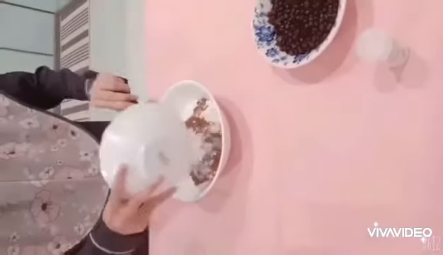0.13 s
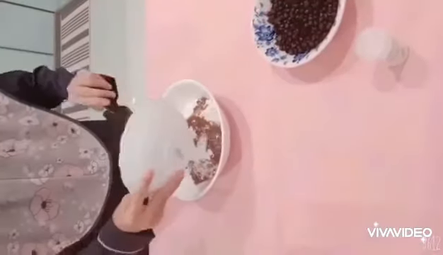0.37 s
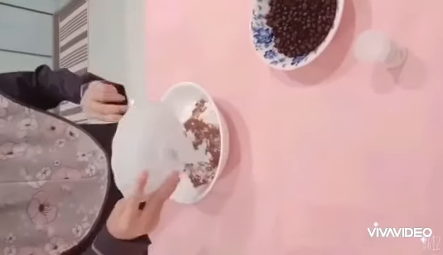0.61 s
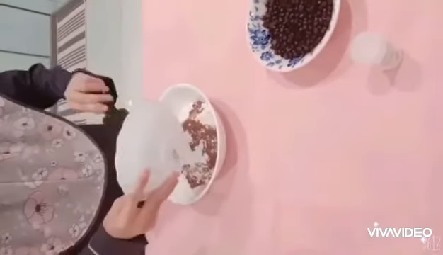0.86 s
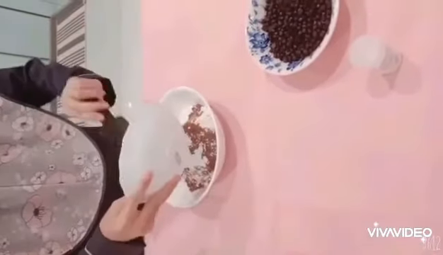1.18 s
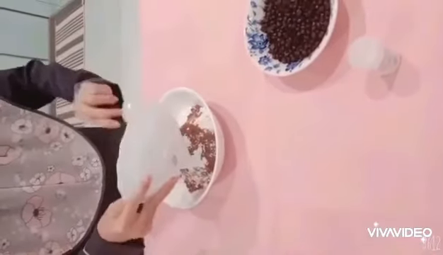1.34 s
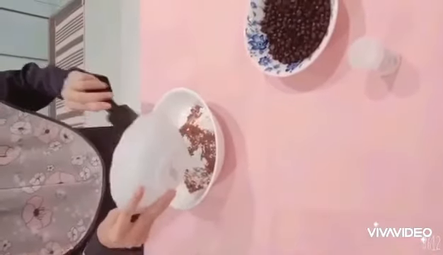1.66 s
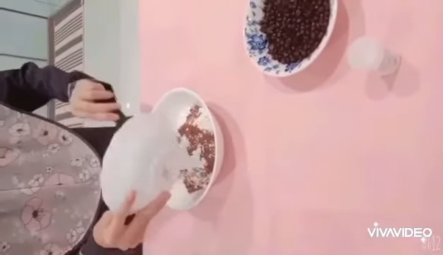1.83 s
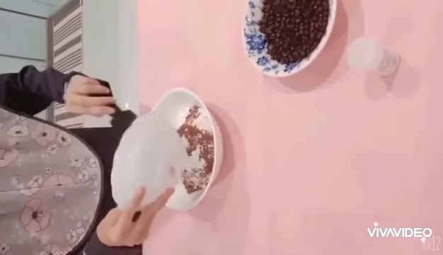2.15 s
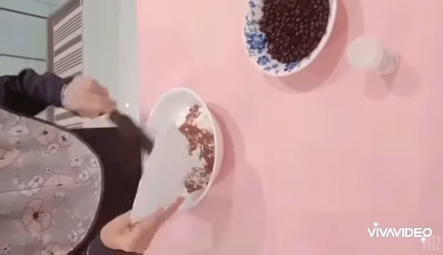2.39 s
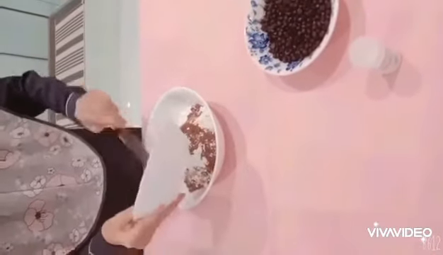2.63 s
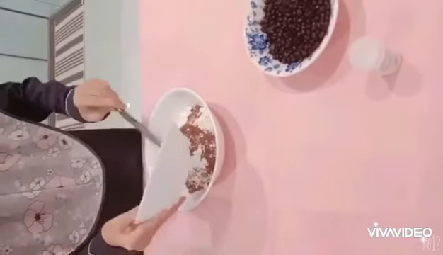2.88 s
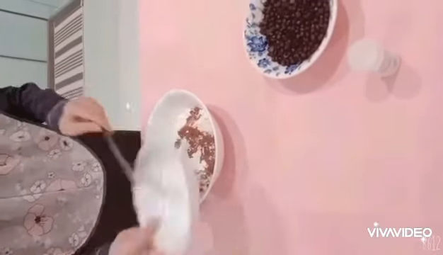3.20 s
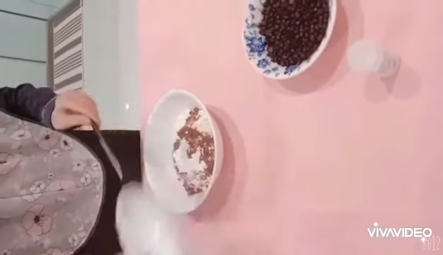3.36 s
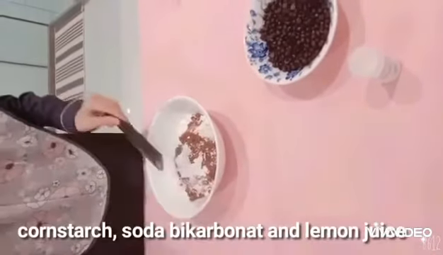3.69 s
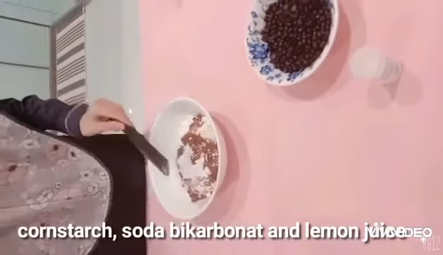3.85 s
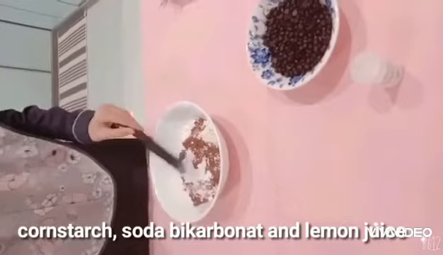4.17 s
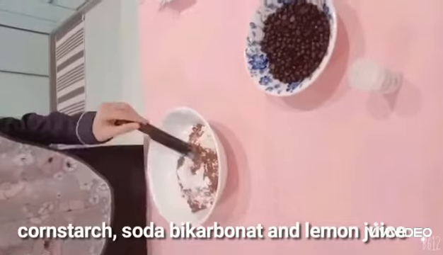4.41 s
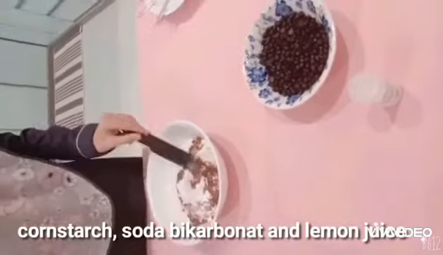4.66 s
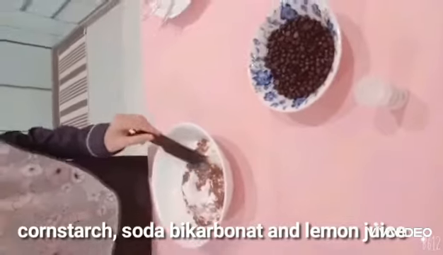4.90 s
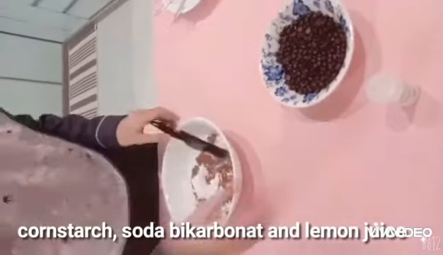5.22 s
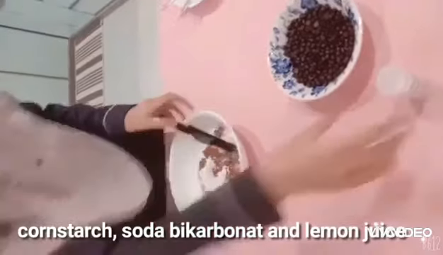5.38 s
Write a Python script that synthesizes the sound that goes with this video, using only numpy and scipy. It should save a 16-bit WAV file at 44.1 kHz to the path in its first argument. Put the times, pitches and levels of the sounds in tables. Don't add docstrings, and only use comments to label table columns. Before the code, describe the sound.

Close, slightly muffled phone pickup at a kitchen table: low hum and soft handling rumble, sparse knife knocks and short hisses of powder grains. Two bright, quickly damped ceramic clinks follow, each with small crumbs and rattles. After a lull comes a much louder double bang of crockery on the table, a final clack, and the room decays back to hum.

```python
import sys
import numpy as np
from scipy import signal
from scipy.fft import rfft, irfft
from scipy.io import wavfile
from scipy.ndimage import uniform_filter1d

SR = 44100
rng = np.random.default_rng(int(sys.argv[2]) if len(sys.argv) > 2 else 0)


def pcm_store(signal):
    levels = np.round(np.clip(np.atleast_2d(signal), -1, 1) * 32767)
    wavfile.write(sys.argv[1], SR, levels.astype(np.int16).T)


def gain_from_decibels(decibels):
    exponent = np.asarray(decibels, float) / 20
    return 10 ** exponent


N = 244029

# (frequency [Hz], level [dB])
CRACK_COLOUR = [(600, -31.5), (900, -3), (1500, -5.5), (2500, 5.5), (4500, 0), (6000, 1.5), (7500, -21.5),
                (10000, -29.5), (11000, -54)]
BRIGHT_RISE_S = 0.0003


def evened(x):
    return x / np.sqrt(np.mean(x ** 2) + 1e-20)


def read(points, hz):
    f, value = np.transpose(points)
    return np.interp(np.log(hz + 1), np.log(f + 1), value)


def add(mix, s, sound):
    part = mix[max(round(s * SR), 0):][:len(sound)]
    part += sound[:len(part)]


def coloured(x, points):
    gain = gain_from_decibels(read(points, np.fft.rfftfreq(len(x), 1 / SR)))
    return irfft(rfft(x) * gain, len(x))


def wobble(count, width_hz, at=None):
    r = np.exp(-np.pi * width_hz * 32 / SR)
    steps = count // 32 + 102
    draws = 700 + steps
    z = rng.standard_normal(draws) + 1j * rng.standard_normal(draws)
    z = signal.lfilter([np.sqrt(0.5 - r * r / 2)], [1, -r], z)[-steps:]
    where = np.arange(count) if at is None else at
    return np.interp(where / 32, np.arange(steps), z)


def mottled(x, patchy_db, bins, frames):
    z = signal.stft(x, nperseg=512, noverlap=384)[2]
    patches = uniform_filter1d(rng.standard_normal(z.shape), size=bins, axis=0)
    patches = uniform_filter1d(patches, size=frames, axis=1)
    return signal.istft(z * gain_from_decibels(patchy_db * evened(patches)), nperseg=512, noverlap=384)[1][:N]


def hollow(hz, width_hz):
    r = np.exp(-np.pi * width_hz / SR)
    slow = rng.standard_normal(N) + 1j * rng.standard_normal(N)
    for _ in range(2):
        slow = signal.lfilter([1 - r], [1, -r], slow)
    return evened((slow * np.exp(2j * np.pi * hz * np.arange(N) / SR)).real)


def ring(modes, rise=0.00067, rough=0., free=0.81):
    longest_s = max(t60 for _, _, t60 in modes)
    t = np.arange(round(SR * min(0.5, free * longest_s))) / SR
    starts = np.arange(len(modes))[:, None] * (SR // 2)
    chance = wobble(SR // 2 * len(modes), 40, starts + np.arange(len(t)))
    hz, db, t60 = np.transpose(modes)[:, :, None]
    blur = 1 + rough * np.minimum(hz / 400, 1) * chance * (1 - np.exp(-t / 0.0033))
    decay = gain_from_decibels(db - 60 * t / (t60 * free))
    x = (decay * blur * np.exp(2j * np.pi * hz * t)).imag.sum(0)
    return x * (1 - np.exp(-t / rise)) / abs(x).max()


def puff(points, t60, rise):
    t = np.arange(SR // 2 if t60 > 0.15 else SR // 8) / SR
    noise = evened(coloured(rng.standard_normal(len(t)), points))
    return noise * gain_from_decibels(-60 * t / t60) * (1 - np.exp(-t / rise))


def kitchen():
    # (frequency [Hz], level [dB per Hz])
    air_colour = [(15, -74), (25, -29.5), (64, -26.5), (123, -6.5), (242, -15), (401, -18.5), (433, -20.5),
                  (586, -27), (878, -30.5), (1250, -15.5), (1420, -31), (1780, -27), (3790, -43.5),
                  (6610, -42.5), (10400, -59.5), (13500, -99), (22000, -120)]
    # (frequency [Hz], width [Hz], level [dB])
    hollows = [(1257, 74, -62.5), (651.4, 240, -70), (315.4, 140, -70.5), (6620, 200, -85.5)]
    # (frequency [Hz], level [dB])
    fan_notes = [(400, -66), (600, -72.5), (7780, -102)]
    # (time [s], level [dB])
    swell = [(0, 0), (.5, 2), (1.25, 0), (1.5, 4.5), (2.5, 3), (2.95, -0.5), (3.2, 4.5), (3.41, 3),
             (3.48, -1.5), (3.55, 2), (3.85, -0.5), (4.5, 4), (4.7, -0.5), (5.2, 5.5), (5.53, 2.5)]
    t = np.arange(N) / SR
    air = gain_from_decibels(-60.5) * evened(coloured(rng.standard_normal(N), air_colour))
    for hz, width_hz, db in hollows:
        air = air + gain_from_decibels(db) * hollow(hz, width_hz)
    waver = uniform_filter1d(rng.standard_normal(N), 1500)
    waver = evened(uniform_filter1d(waver, 1500))
    whine = np.zeros(N)
    for hz, db in fan_notes:
        whine += gain_from_decibels(db) * ((1 + 0.62 * wobble(N, 8.4)) * np.exp(2j * np.pi * hz * t)).real
    swell_db = np.interp(t, *np.transpose(swell))
    return mottled(air, 2.75, bins=3, frames=12) * gain_from_decibels(swell_db + 1.1 * waver) + whine


def table_rumble():
    # (time of peak [s], length [s], lower note level [dB], upper note level [dB])
    pushes = [(0.0, 0.071, -50.5, -55), (0.26, 0.46, -68.5, -62.5), (0.638, 0.1, -55.5, -57),
              (1.045, 0.037, -47.5, -53), (1.2, 0.047, -56, -71), (1.372, 0.13, -55.5, -51.5),
              (1.871, 0.11, -51, -53.5), (2.07, 0.36, -49.5, -55.5), (2.315, 0.1, -51, -49.5),
              (2.526, 0.27, -58, -49), (3.166, 0.067, -52, -52.5), (3.342, 0.16, -58.5, -55),
              (3.64, 0.09, -62, -68), (3.967, 0.21, -50.5, -61), (4.222, 0.19, -49, -57),
              (4.496, 0.17, -45.5, -54.5), (4.814, 0.14, -46, -37.5), (4.98, 0.23, -50.5, -38.5),
              (5.225, 0.072, -51, -67), (5.315, 0.25, -46.5, -53.5)]
    note_hz = (121, 183)
    note_width_hz = (6, 10)
    idle_levels = (-70, -66.5)
    haste = 1.26
    edge_db = 12.5
    t, out = np.arange(N) / SR, np.zeros(N)
    steps = t[::64]
    s, length, *level_db = np.transpose(pushes)[:, :, None]
    away = abs(np.where(steps < s, haste, 1) * 2 * (steps - s) / length)
    for db, idle_db, hz, width_hz in zip(level_db, idle_levels, note_hz, note_width_hz):
        force = gain_from_decibels(idle_db) + gain_from_decibels(db - edge_db * away ** 1.8).sum(0)
        z = uniform_filter1d(wobble(N, width_hz), size=600)
        z = z / abs(z) ** 0.5
        out += np.interp(t, steps, force) * evened((z * np.exp(2j * np.pi * hz * t)).real)
    return out


def thud():
    # (frequency [Hz], level [dB], t60 [s])
    top_modes = [(150, -14, .4), (210.3, 6.5, .6), (252.5, 3.5, 0.45), (326, -1, 0.33), (410, -12, 0.29),
                 (518, -3, 0.26), (574, -1, 0.24), (738, -14, 0.57), (778, -2.5, 0.25), (960, -19.5, 0.27),
                 (1250, -12, .4), (1265, 11, 0.15), (1351, -2, 0.47), (1570, -16, .2)]
    # (frequency [Hz], level [dB per Hz])
    boom_colour = [(15, -48), (25, -30), (76, -28), (118, -20), (155, -13.5), (340, -12.5), (661, -18.5),
                   (1250, -16), (1860, -35.5), (3500, -39), (9000, -58.5), (11700, -82), (19800, -120)]
    # (time [s], modes level [dB], boom level [dB], boom t60 [s])
    blows = [
        (4.9051, -17, -22, 0.35),
        (4.94, -25, -41.5, 0.42),
    ]
    out = np.zeros(N)
    for s, modes_db, boom_db, t60 in blows:
        add(out, s, gain_from_decibels(modes_db) * ring(top_modes, rise=0.00048, rough=0.4, free=0.85))
        add(out, s, gain_from_decibels(boom_db) * puff(boom_colour, t60, 0.00025))
    return out


def soft_notes():
    # (time [s], frequency [Hz], level [dB], t60 [s])
    soft_hits = [(0.281, 3220, -74, 0.15), (.63, 660, -57, 0.067), (0.646, 5580, -66, 0.27),
                 (0.699, 5560, -58, 0.093), (.705, 7720, -78, .07), (.715, 3690, -66.5, 0.22),
                 (0.986, 5560, -63, 0.16), (1.04, 497, -55.5, 0.094), (1.152, 3200, -69.5, 0.2),
                 (1.21, 5870, -69.5, 0.06), (1.37, 65.6, -60, 0.21), (1.586, 2900, -52, 0.014),
                 (1.691, 321, -45.5, 0.21), (1.87, 502, -54, 0.13), (1.93, 902, -54.5, 0.093),
                 (2.021, 5770, -49.5, 0.027), (4.912, 121.7, -29, 1.05), (2.117, 61.6, -52, 0.25),
                 (2.327, 1217, -35, 0.054), (2.813, 5000, -76, 0.079), (2.827, 2445, -53.5, 0.076),
                 (3.715, 2846, -59.5, 0.32), (4.777, 9470, -58, 0.15), (4.9057, 1213, -21.5, 0.037),
                 (5.315, 2230, -60, 0.13), (5.328, 5330, -66, 0.03), (5.43, 728, -57, 0.12)]
    softness_per_s, slowest_rise_s = 0.24, 0.014
    out = np.zeros(N)
    for s, hz, db, t60 in soft_hits:
        rise = min(softness_per_s * t60 ** 2, slowest_rise_s)
        add(out, s, gain_from_decibels(db + 6.5) * ring([(hz, 0, t60)], rise, 1.5 * (hz > 1000)))
    return out


def snaps():
    # (time [s], peak level [dB], t60 [s])
    crumbs = [(1.4618, -56, 0.0066), (1.575, -41, 0.011), (2.019, -61, .015), (2.5, -59, 0.013),
              (3.0712, -44, .012), (3.087, -46, .012), (3.137, -46, .012), (3.523, -48, 0.11),
              (4.771, -25, 0.0067), (4.7815, -31.5, .012), (4.923, -47, .12), (5.095, -30, 0.013),
              (5.108, -44, .06), (.403, -64, .01), (4.78, -38.5, .14), (3.535, -49, .14),
              (1.942, -56, .012), (5.125, -50, .14), (4.83, -46.5, .14)]
    out = np.zeros(N)
    for s, db, t60 in crumbs:
        add(out, s, gain_from_decibels(db) * puff(CRACK_COLOUR, t60, BRIGHT_RISE_S))
    return out


def touches():
    # (time [s], frequency [Hz], peak level [dB], t60
    # [s])
    touch_notes = [(0.990, 3360, -47, .03), (1.019, 3680, -62.5, 0.17), (1.225, 2900, -66, .05),
                   (1.4608, 1200, -32, 0.023), (1.479, 5130, -54, .03), (1.489, 1262, -37, 0.085),
                   (1.586, 3180, -44, .025), (1.598, 2650, -49.5, .1), (1.598, 5620, -48, .06),
                   (1.614, 2730, -62, .1), (2.326, 2275, -40, 0.018), (2.332, 669, -44, 0.18),
                   (2.339, 2260, -49, 0.11), (2.344, 916, -42, 0.064), (2.352, 1260, -37, 0.14),
                   (2.352, 4430, -59, 0.054), (2.457, 4740, -60, .1), (3.0555, 4400, -42, .025),
                   (3.086, 2980, -51, .03), (3.098, 2137, -43.5, 0.23), (3.124, 3630, -43, 0.079),
                   (3.128, 5545, -46.5, 0.3), (3.135, 1130, -41, 0.035), (3.522, 2220, -40, 0.21),
                   (3.549, 5518, -60, .3), (3.565, 2137, -38.5, 0.26), (3.767, 1237, -42, 0.067),
                   (3.983, 1250, -39.5, 0.07), (4.781, 2170, -15, 0.033), (4.797, 1254, -24.5, 0.17),
                   (4.797, 3704, -27, 0.11), (4.812, 2164, -34, 0.081), (4.868, 5860, -31, 0.073),
                   (4.882, 3750, -35, 0.085), (4.929, 1265, -39, 0.057), (5.095, 2740, -26, .05),
                   (5.111, 3790, -50, 0.36), (5.15, 2180, -39.5, 0.18), (5.19, 4080, -50, 0.15),
                   (5.202, 5730, -59, 0.16),
                   (.70, 5560, -53, 0.094), (1.098, 1252, -48, 0.069), (1.309, 1250, -46, 0.066),
                     (2.018, 3000, -51, .03), (3.057, 5600, -46, .12), (3.066, 4520, -40, .05),
                     (3.09, 6970, -61, .25), (3.598, 5520, -50, 0.16), (3.61, 4900, -56, 0.17),
                     (4.782, 5950, -27, 0.077), (4.906, 827, -11.5, 0.02), (4.9068, 255, -14, 0.073),
                     (4.939, 216.2, -32, 0.5), (5.1, 3445, -35.5, .08), (5.1, 4380, -34, 0.065),
                     (5.13, 5950, -56, 0.21), (5.191, 3790, -46, 0.27), (5.259, 3790, -51, 0.15),
                     (5.419, 3770, -63, 0.13), (2.736, 1250, -37, 0.047), (2.735, 2400, -43, .03),
                     (2.812, 4720, -61, .12), (2.812, 6900, -53, 0.052), (2.826, 5900, -59, .05),
                     (3.487, 1257, -45, .12), (3.685, 1250, -46, .08), (4.772, 5560, -20, .09),
                     (4.79, 5000, -42, .12), (4.796, 1287, -20.5, 0.17), (4.835, 1250, -29.5, .05),
                     (4.907, 1283, -19.5, 0.24), (4.908, 356, -26.5, 0.21), (4.908, 504.3, -25.5, 0.4),
                     (4.908, 771, -22.5, 0.19), (4.92, 5545, -38, .25), (4.925, 5100, -45, 0.28),
                     (4.918, 6880, -44, .13), (5.0935, 1250, -23.5, 0.056), (5.098, 5700, -30.5, .1),
                     (5.112, 5600, -33, 0.057), (4.945, 949, -29, 0.16), (1.595, 3100, -57, .1),
                     (4.908, 410, -28.5, 0.21), (4.925, 785, -33, 0.22), (4.91, 75, -37, 0.34),
                     (5.04, 185, -36.5, 0.41), (4.79, 7760, -46.5, 0.24), (3.652, 3700, -50, 0.13),
                     (.706, 5500, -56, .05), (5.095, 3000, -31, 0.033)]
    out = np.zeros(N)
    for s, hz, db, t60 in touch_notes:
        add(out, s, gain_from_decibels(db) * ring([(hz, 0, t60)], rise=0.033 * t60, rough=0.32))
    return out


def cracks():
    # (time [s], peak level [dB], crackle t60 [s])
    hard_hits = [
        (3.055, -12, 0.069),
        (3.0744, -49, 0.025),
        (3.517, -14.5, 0.051),
        (4.7701, -11.5, 0.015),
        (4.7815, -14, 0.031),
        (5.0943, -22, 0.05),
    ]
    out = np.zeros(N)
    for s, peak_db, t60 in hard_hits:
        add(out, s, gain_from_decibels(peak_db - 12.5) * puff(CRACK_COLOUR, 0.012, 0.0002))
        add(out, s, gain_from_decibels(peak_db - 34.5) * puff(CRACK_COLOUR, t60, 0.0016))
    return out


def ceramic(blows, shapes, rough, free):
    out = np.zeros(N)
    for s, second_db, first_db, third_db, fourth_db in blows:
        for db, modes in zip((first_db, second_db - 9.5, third_db, fourth_db), shapes):
            add(out, s, gain_from_decibels(db + 3.0) * ring(modes, 0.0009, rough, free))
    return out


def rim_taps():
    # (frequency [Hz], level [dB], t60 [s])
    held_shapes = [
        [(942, 5, 0.1), (1255, 3.5, 0.19), (930, 4.5, 0.09)],
        [(2127, 2.5, 0.2), (2260, -3.5, 0.091), (2900, -20, 0.59), (2800, -15, 0.4)],
        [(3698, 6, 0.3), (3730, -1.5, 0.066), (4640, -24, .2)],
        [(5770, -10, 0.1), (5545, -11, 0.33), (5900, -9, 0.15), (5518, 10, 0.1), (7720, -5.5, 0.14)],
    ]
    # (time [s], level [dB] of the second, first, third and fourth shape)
    taps = [
        (2.8115, -56, -76, -75, -52),
        (2.831, -49, -60, -66, -51),
        (3.0574, -22, -63, -52, -41),
        (3.0744, -51, -39, -66, -60),
        (3.1144, -55, -65, -60, -63),
        (3.1344, -52, -55, -45, -42),
        (3.5158, -24, -31.5, -30, -26),
        (3.899, -76, -63, -85, -64),
    ]
    return ceramic(taps, held_shapes, rough=0.53, free=0.43)


def landing():
    # (frequency [Hz], level [dB], t60 [s])
    resting_shapes = [
        [(1254, -7.5, 0.16), (1537, -4, 0.051), (1030, -19.5, 0.053)],
        [(2164, 6, 0.29), (2242, -3, 0.28), (2400, -2.5, 0.039), (2810, -1.5, 0.071)],
        [(3700, -1, 0.13), (3704, 4, 0.2), (4230, -16, 0.1), (3100, -19, 0.075)],
        [(5600, -6.5, 0.29), (5640, 18.5, 0.13), (5900, 4, 0.15), (5560, 8, 0.12), (7760, -19.5, 0.3),
         (10200, -18.5, 0.25)],
    ]
    # (time [s], level [dB] of the second, first, third and fourth shape)
    bounces = [
        (4.7711, -9.5, -17, -31.5, -13.5),
        (4.7845, -33, -33, -21.5, -16.5),
        (4.7944, -38, -32, -27.5, -21.5),
        (4.817, -14, -38, -46, -51),
        (4.8642, -23, -29, -44.5, -34.5),
        (4.9172, -46, -17, -54, -27.5),
    ]
    return ceramic(bounces, resting_shapes, rough=0.8, free=0.38)


def settling():
    # (frequency [Hz], level [dB], t60 [s])
    settled_shapes = [
        [(1245, -8, 0.15), (1514, 6.5, 0.059), (1871, 3, 0.039)],
        [(2137, -3, 0.14), (2230, 3, 0.22), (2610, -8.5, 0.22), (2686, 1.5, 0.069), (2870, -14, 0.14)],
        [(3790, 3, 0.66), (3445, -6, 0.091), (4380, -3, 0.071)],
        [(5670, 15, 0.062), (5560, 3, 0.2), (5950, -12, 0.17), (5560, -5, 0.24), (7760, -7, 0.11)],
    ]
    # (time [s], level [dB] of the second, first, third and fourth shape)
    rocks = [
        (5.0985, -10.5, -20, -35.5, -26),
        (5.1056, -36, -42, -35.5, -38),
        (5.1145, -36, -50, -32.5, -33),
    ]
    return ceramic(rocks, settled_shapes, rough=0.35, free=0.39)


def blade_chimes():
    # (frequency [Hz], t60 [s])
    steel_notes = [
        (6970, 0.15),
        (9620, 0.083),
    ]
    # (time [s], lower note peak level [dB], upper note level [dB])
    chimes = [(0.4045, -78, -91), (0.989, -49.5, -71), (1.064, -66, -90), (1.1, -55.5, -90),
              (1.1495, -56, -69), (1.2092, -72, -78), (1.4594, -41, -67), (1.547, -49, -89),
              (1.584, -43, -66.5), (1.828, -55.5, -101), (1.899, -46, -86), (1.925, -42.5, -83),
              (2.0198, -58, -83), (2.326, -51, -63), (2.4643, -76, -86), (2.6876, -55, -96),
              (2.7338, -71, -77), (3.055, -47, -96), (3.5142, -45, -64.5), (4.77, -50, -66),
              (4.9193, -32.5, -77), (5.0973, -63, -72)]
    low, high = [ring([(hz, 0, t60)], rise=0.0013, rough=0.59, free=0.74) for hz, t60 in steel_notes]
    out = np.zeros(N)
    for s, low_db, high_db in chimes:
        add(out, s, gain_from_decibels(low_db) * low)
        add(out, s, gain_from_decibels(high_db + 10.5) * high)
    return out


def blade_knocks():
    # (time [s], tick peak level [dB], body level [dB])
    knocks = [(0.402, -50, -67), (0.9905, -34.5, -48), (1.096, -58, -63), (1.31, -71, -67),
              (1.462, -39, -37.5), (1.586, -40, -59), (1.797, -65, -58), (1.831, -60, -47.5),
              (2.018, -46, -64), (2.3268, -35, -32), (2.356, -60, -52), (2.456, -42.5, -66),
              (2.689, -56, -38), (2.732, -51, -41.5), (3.489, -59, -80), (3.773, -67, -69),
              (3.9773, -60, -44.5)]
    # (frequency [Hz], level [dB])
    tick_colour = [(1500, -49), (2500, 0.5), (5000, 10.5), (7000, 12.5), (9500, -40), (11000, -46)]
    # (frequency [Hz], level [dB])
    body_colour = [(200, 0), (450, 5.5), (900, 8.5), (1300, 2.5), (2300, -13), (3200, -43)]
    t60_s = 0.086
    out = np.zeros(N)
    for s, tick_db, body_db in knocks:
        add(out, s, gain_from_decibels(tick_db - 9) * puff(tick_colour, 0.007, BRIGHT_RISE_S))
        add(out, s, gain_from_decibels(tick_db - 26.0) * puff(tick_colour, t60_s, 0.00036))
        add(out, s, gain_from_decibels(body_db - 6.5) * puff(body_colour, t60_s, 0.00017))
    return out


def scrape():
    # (frequency [Hz], level [dB])
    stroke_colours = [
        [(3600, -42), (4500, -3.5), (5600, 4.5), (6300, 0.5), (7200, -24), (8000, -42.5), (9600, -17),
         (10600, -63)],
        [(2000, -10.5), (2500, -3.5), (3100, 0.5), (3500, -9.5), (4300, -13.5), (4800, -50.5)],
        [(800, -37), (1200, 22.5), (1700, -3), (2300, 8.5), (2800, -31.5)],
    ]
    # (start time [s], length [s], level [dB], brightness [dB]: fizz up, dull part down)
    strokes = [(0., 0.068, -60, -5.5), (.016, 0.24, -69.5, -7.5), (.382, 0.048, -68.5, -6),
               (.6, 0.19, -74.5, 3.5), (1.002, 0.053, -65, -6), (1.148, 0.1, -73, -5),
               (1.455, 0.068, -72, -20), (1.585, 0.081, -61.5, 4), (1.793, 0.053, -70, -5),
               (1.907, 0.083, -57.5, -1), (2.014, 0.053, -62.5, 1), (2.052, .13, -71.5, 10),
               (2.327, 0.063, -69, 5), (2.456, 0.066, -66, -3.5), (2.683, 0.1, -61, -10.5),
               (2.806, 0.075, -71, 8), (3.048, 0.16, -53, -5), (3.322, 0.14, -58, -1),
               (3.504, 0.15, -55.5, -6.5), (3.886, 0.23, -70.5, -7.5), (4.78, 0.058, -39, -11.5),
               (4.911, 0.075, -52, 7.5), (5.092, 0.033, -35.5, -8), (5.126, 0.1, -57.5, -9.5),
               (5.297, 0.1, -74, 2.5), (5.41, 0.2, -72, -1.5)]
    size_db = 2.8 * np.minimum(rng.exponential(1, (3, N // 40 + 1)), 3.5)
    grains = rng.standard_normal((3, N)) * gain_from_decibels(size_db).repeat(40, axis=1)[:, :N]
    press = np.zeros((3, N))
    for s, length, strength_db, bright_db in strokes:
        u = np.linspace(0, 1, round(length * SR))
        shape = np.sqrt(u) * (1 - u) ** 1.24
        for row, tilt_db in zip(press, (bright_db, 1, -bright_db)):
            add(row, s, gain_from_decibels(strength_db + tilt_db + 6.0) * shape)
    out = np.zeros(N)
    for grain, colour, force in zip(grains, stroke_colours, press):
        out += force * evened(mottled(coloured(grain, colour), 2.8, bins=2, frames=24))
    return out


def room(x):
    # (frequency [Hz], t60 [s])
    room_decay = [(100, 0.58), (500, 0.67), (2000, 0.53), (6000, 0.42), (10000, 0.14)]
    taps = np.zeros(SR)
    at = np.arange(300, SR - 20, 20)
    taps[at + rng.integers(0, 20, len(at))] = rng.choice([-1., 1.], len(at))
    hz, t, z = signal.stft(taps, SR, nperseg=256)
    tail = signal.istft(z * gain_from_decibels(-60 * t / read(room_decay, hz)[:, None]), SR, nperseg=256)[1]
    return signal.fftconvolve(x, tail / np.linalg.norm(tail))[:N]


def scene():
    heavy = rim_taps() + landing() + settling() + thud()
    hits = heavy + blade_chimes() + blade_knocks() + cracks() + soft_notes()
    mix = hits + gain_from_decibels(-11.0) * room(hits)
    mix += scrape() + table_rumble() + kitchen()
    mix += gain_from_decibels(-9.5) * heavy * wobble(N, 500).real
    return (mix + touches() + snaps())[None]


def roll_off(x):
    return signal.sosfilt(signal.butter(12, 10560, fs=SR, output="sos"), x)


def record(dry):
    thinned = signal.lfilter(*signal.butter(2, 45, "high", fs=SR), dry)
    edge = signal.firwin(201, 10450, window=("kaiser", 8), fs=SR)
    return roll_off(signal.oaconvolve(thinned, edge[None], "same"))


dry = scene()
out = record(dry)
pcm_store(out)
```